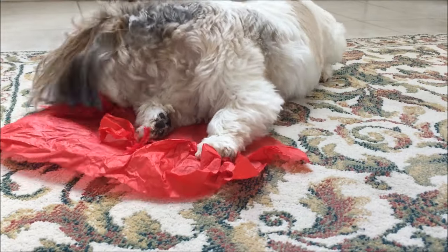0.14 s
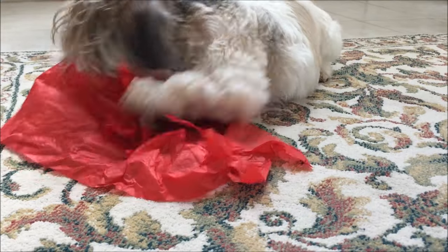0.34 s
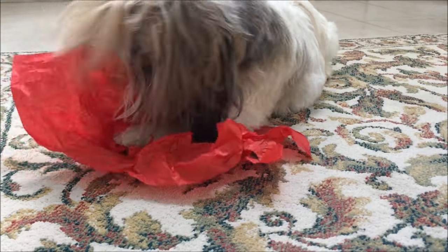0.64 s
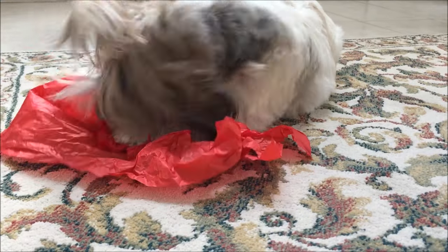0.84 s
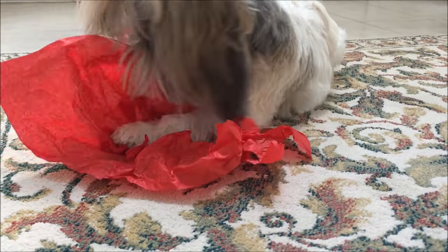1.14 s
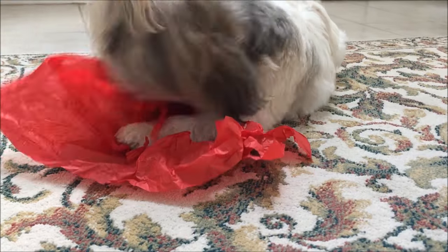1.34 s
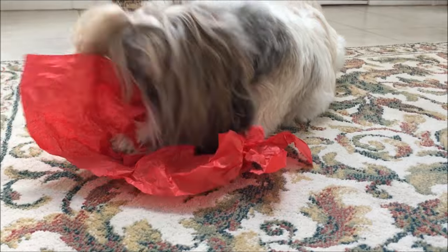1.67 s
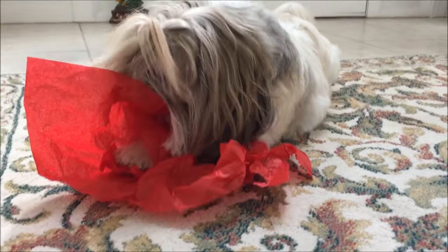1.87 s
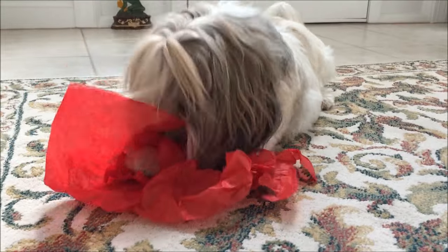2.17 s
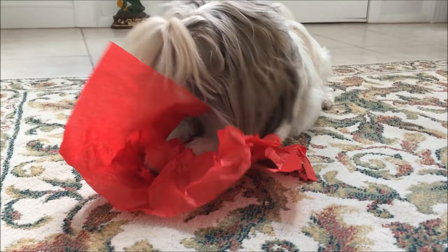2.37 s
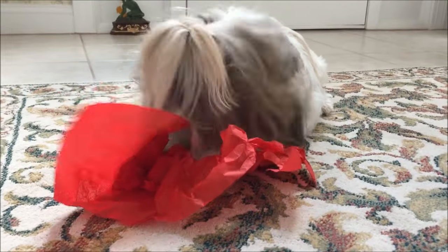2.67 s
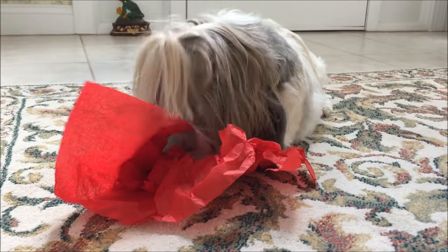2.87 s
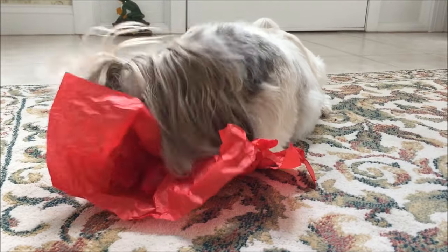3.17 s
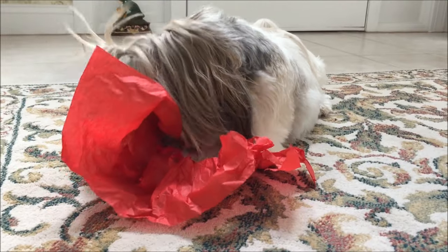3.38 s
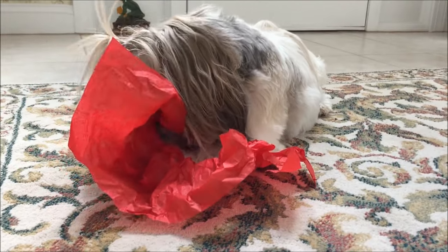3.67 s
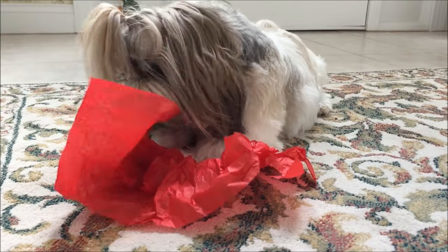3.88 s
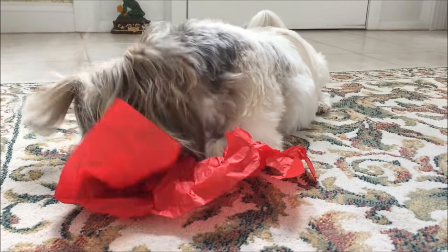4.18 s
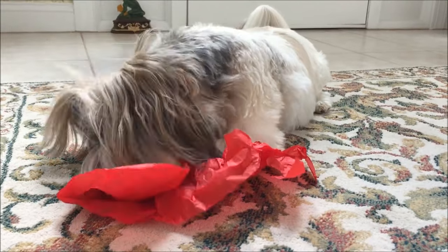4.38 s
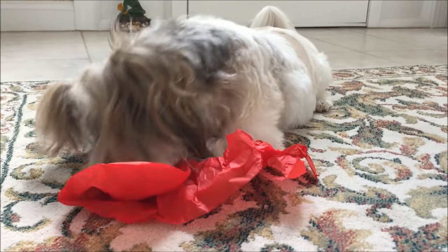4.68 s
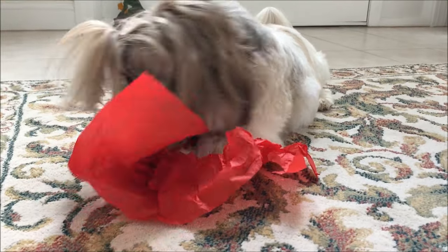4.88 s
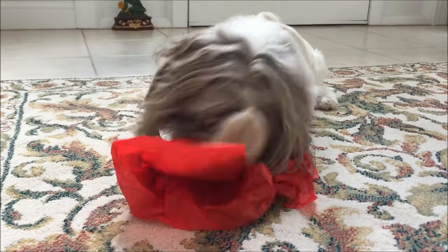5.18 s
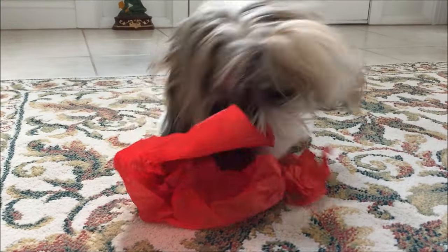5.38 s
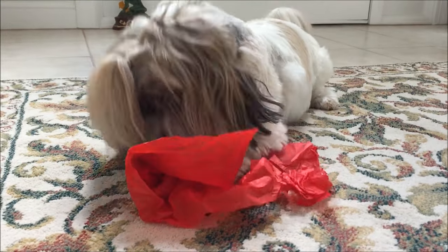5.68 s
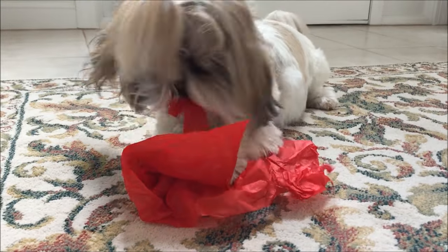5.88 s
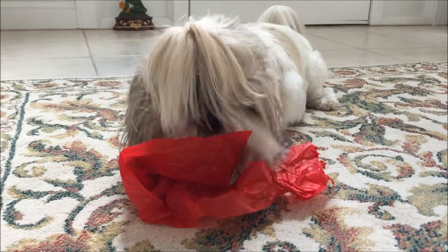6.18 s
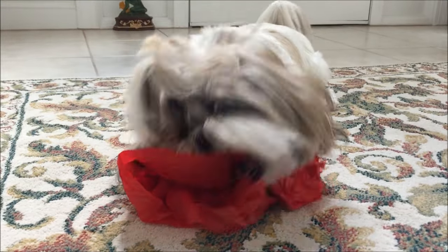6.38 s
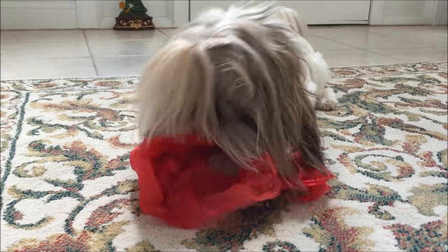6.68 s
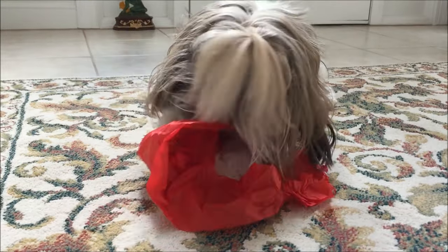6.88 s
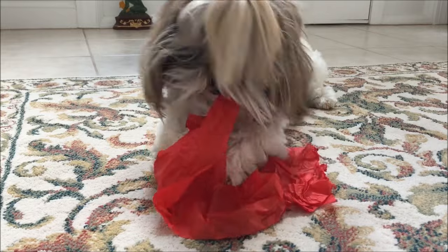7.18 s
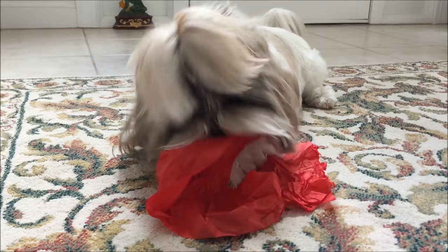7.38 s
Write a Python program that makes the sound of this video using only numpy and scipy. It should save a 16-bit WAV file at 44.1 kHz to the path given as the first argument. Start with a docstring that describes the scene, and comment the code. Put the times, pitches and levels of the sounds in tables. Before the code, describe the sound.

Close view of a small dog pawing and nosing tissue paper on a rug in a tiled room. Quiet rustling starts it, then short crackling strokes come irregularly, with crisp snaps, papery flaps and faint paw thuds. Bursts grow strongest after about five seconds, ease briefly near six, then return as sharp crinkles. The room adds a short, light echo over very faint air.

```python
"""A tiled room, where a small dog paws and noses a sheet of tissue paper on a rug.
Creases buckle in clusters of tiny slips: fast and dense under a stroke, single snaps and ticks besides.
The sheet's facets rustle and its broad panels flap; each is filtered noise driven by the same buckles.
Paws thud as short fading sine waves, the room answers with echoes of fading noise, and faint air hisses."""
import sys
import numpy as np
from scipy import signal
from scipy.fft import rfft, irfft, next_fast_len
from scipy.io import wavfile
from scipy.ndimage import uniform_filter1d, map_coordinates

SR = 44100
rng = np.random.default_rng(int(sys.argv[2]) if len(sys.argv) > 2 else 0)


def to_wav(s):
    """Save 16-bit WAV."""
    ch = np.atleast_2d(s).T  # columns
    pcm = np.round(np.clip(ch, -1, 1) * 32767)  # PCM
    wavfile.write(sys.argv[1], SR, pcm.astype(np.int16))


N = 332073  # length in samples, about 7.5 seconds

# Pushes of paw or muzzle on the sheet. Each row: start in seconds, attack in seconds, hold in seconds,
# release in seconds, crease crackle level in dB, facet rustle in dB relative to the crackle,
# panel flap in dB relative to the crackle, facet pitch in Hz.
PUSHES = [ (0.0, 0.0061, 0.052, .15, -70, -2, -13, 1400), (0.17, .045, 0.038, 0.098, -57, -1, -11.5, 1604),
          (0.33, 0.075, .06, 0.11, -55, 0, -10, 1400), (0.469, .11, 0.089, 0.051, -46, -2.5, -5.5, 1100),
          (0.66, .04, .13, .08, -51, -2.5, -5.5, 1100), (0.901, .025, .03, 0.062, -60.5, -2.5, -13, 983),
          (0.959, 0.054, .03, .035, -57, -2.5, -7, 980), (1.04, 0.024, 0.47, 0.13, -70.5, -4, -4.5, 1150),
          (1.315, 0.029, 0.072, .022, -52, -4.5, -4, 1105), (1.529, 0.05, 0.009, 0.12, -53, -1, -5.5, 990),
          (1.7, 0.039, 0.083, 0.049, -68, 0.5, 0, 1200), (1.81, 0.067, 0.039, 0.049, -51, -2, -4.5, 1201),
          (1.87, 0.064, 0.034, 0.051, -46, -1, -9, 1152), (1.96, 0.042, 0.057, .09, -54, 0.5, -6.5, 1200),
          (2.09, 0.048, .04, 0.061, -58, 1.5, -1.5, 1296), (2.21, 0.038, .015, .06, -46, 0, -10, 1148),
          (2.259, 0.059, 0.044, 0.077, -48.5, 0.5, -11, 1079),
          (2.38, .015, .15, 0.078, -45, -2.5, -6, 1179),
          (2.549, 0.064, 0.074, 0.059, -43, -2.5, -10.5, 1079),
          (2.779, 0.046, .14, 0.055, -57, -5.5, -6, 1030), (3.08, .06, 0.069, 0.095, -58, -1.5, -5, 971),
          (3.189, 0.053, .035, .14, -45.5, -5.5, -13.5, 969), (3.29, .04, .14, .1, -53, -1, -13, 1050),
          (3.49, 0.039, .17, 0.041, -55, -7, -18, 1347), (3.9, .015, .02, .05, -67, 3, -14, 1150),
          (3.943, .02, .005, .02, -40, -2.5, -9.5, 1154), (3.949, .03, 0.042, .07, -52, -3.5, -5, 1096),
          (4.11, .07, .04, 0.082, -56, 0, -7, 1051), (4.19, .05, .06, 0.055, -49.5, -2, -8, 1100),
          (4.381, .045, 0.021, .08, -49, -2.5, -14.5, 1098), (4.48, 0.029, .01, 0.12, -50, 1.5, -12, 1010),
          (4.652, 0.024, .03, .06, -56, 0.5, -20, 1403), (4.688, 0.041, .025, 0.036, -48.5, -4, -20, 1536),
          (4.751, 0.049, .1, .06, -57, -0.5, -12, 1402), (4.911, .02, 0.12, 0.038, -43, -2.5, -13.5, 1257),
          (5.06, .02, 0.061, 0.098, -60, 1.5, -10, 1156), (5.17, 0.047, 0.0795, 0.11, -53, -2, -14, 1168),
          (5.3, .1, .05, 0.053, -40, -3, -19, 1349), (5.39, 0.081, 0.054, 0.058, -36, -3, -15.5, 1299),
          (5.531, .03, .01, 0.17, -50, -2, -14, 1198), (5.701, .045, .015, 0.2, -43, -2, -14, 1370),
          (5.81, 0.073, 0.071, .13, -41.5, -5, -13, 1050), (6.099, .03, .2, .1, -68, -1, -9, 1198),
          (6.318, 0.043, .02, 0.064, -59, 0, -16, 1232), (6.39, .04, .12, .1, -64, -4.5, -12, 1271),
          (6.5, .13, .04, .14, -47, 0, -13, 1301), (6.64, .17, 0.065, 0.069, -43, -4, -16, 1281),
          (6.889, .04, 0.098, 0.081, -51, -2.5, -5.5, 1148),
          (7.07, .03, 0.074, 0.083, -40.5, -5.5, -11, 1023),
          (7.14, 0.049, 0.12, 0.078, -42, -7, -9.5, 978.3),
          (7.419, .035, 0.079, 0.096, -58, -6.5, -19, 1198)]
# Single creases that snap through. Each row: time in seconds, snap energy in dB (before the fixed trims
# in snaps), facet rustle in dB relative to the snap (before its own trim).
SNAPPING_CREASES = [(0.211, -33.5, 7), (0.4617, -30, 4), (0.5902, -13, 1), (0.6657, -18.5, 3),
                    (0.9213, -38, -6), (1.2306, -42, -5), (1.328, -28, -15), (1.3503, -22, -18),
                    (1.4198, -32, 8), (1.583, -26, -6.5), (1.85, -33, 12), (2.072, -31, 1),
                    (2.1106, -29.5, -11), (2.1818, -25.5, 1), (2.2394, -29, 1), (2.3232, -35.5, 16),
                    (2.3932, -12, -4), (2.3961, -11.5, 2.5), (2.4939, -17.5, 0), (2.505, -15.5, -1),
                    (2.5935, -16, -8), (2.6396, -12.5, -7.5), (2.6898, -16, -2), (2.7009, -21, -3),
                    (2.722, -20.5, -8), (2.7448, -21.5, -19), (2.889, -24, -8.5), (3.1646, -27, -5),
                    (3.4562, -18.5, 1), (3.4623, -22, -1.5), (3.468, -19, 2.5), (3.5331, -24.5, -5),
                    (3.671, -22, -4.5), (3.6926, -24.5, -3), (3.8272, -37, -4), (3.9535, -21, 0.5),
                    (3.966, -10.5, -4), (4.1636, -27, -20), (4.429, -28, -4), (4.5109, -21, 4.5),
                    (4.813, -28, -9.5), (4.9346, -21.5, -5), (5.2098, -25, -8), (5.3988, -13, -22),
                    (5.508, -9, -13), (5.52, -8.5, -6.5), (5.5538, -14.5, -4.5), (6.1341, -28, -11),
                    (6.2498, -34, 0.5), (6.3207, -40.5, 10.5), (6.484, -28.5, -10), (6.5584, -40.5, 16),
                    (6.858, -13, 2.5), (6.9306, -15.5, -12.5), (6.9584, -17.5, -3.5), (7.01, -22, -4.5),
                    (7.0152, -11, -13.5), (7.03, -23, -11), (7.054, -21, -2.5), (7.2279, -15, -7.5),
                    (7.259, -11.5, -14), (7.3233, -16, -21), (7.428, -33.5, -11)]
# Paws and muzzle landing on the rug. Each row: time in seconds, peak level in dB (before the trim in paws),
# pitch in Hz.
LANDINGS = [(0.601, -41, 141), (0.669, -40, 72.7), (0.71, -41.5, 61.9), (0.949, -50, 64.83),
            (1.009, -46, 51.1), (1.399, -42.5, 174.5), (1.42, -43, 86.94), (1.479, -46, 45.76),
            (1.519, -49, 68), (1.578, -47.5, 199), (2.409, -42, 80.75), (3.399, -48, 107.6),
            (4.018, -52, 123), (5.95, -49, 135), (6.858, -46, 198.8)]
# Tone colour of a buckling crease. Each row: frequency in Hz, relative strength in dB per Hz.
CREASE_COLOUR = [(1180, -32), (2000, -6), (2410, -8), (3550, 0), (3940, -4.5), (5310, 0), (7610, -3.5),
                 (9270, -4.5), (10400, -7), (11500, -4), (14600, -5.5), (15500, -16.5)]
# Tone colour of the rustling facets. Each row: frequency in Hz, relative strength in dB per Hz.
FACET_COLOUR = [(240, -32.5), (400, -0.5), (550, 1.5), (700, -0.5), (950, 0), (1400, -1.5), (1950, -2.5),
                (2400, -6), (3100, -8.5), (5300, -85)]
# Tone colour of the flapping panels. Each row: frequency in Hz, relative strength in dB per Hz.
PANEL_COLOUR = [(30, -50), (60, -6.5), (130, -3), (230, 0.5), (315, 0.5), (380, -7), (470, -9), (620, -17),
                (1000, -86.5)]
# Tone colour of the room's steady air. Each row: frequency in Hz, relative strength in dB per Hz.
AIR_COLOUR = [(20, -25), (45, 5.5), (120, 0.5), (250, -10), (500, -22), (1500, -15.5), (5000, -17),
              (15000, -25)]
# How long echoes last. Each row: frequency in Hz, time to fade by 60 dB in seconds.
ECHO_TIME = [(100, 0.17), (1000, 0.36), (4000, 0.24), (14000, 0.08)]
# How strong the echoes are. Each row: frequency in Hz, room level in dB.
ECHO_LEVEL = [(100, -15), (500, -12.5), (1200, -11.5), (3000, -11), (7000, -16), (15000, -7.5)]

TOP_HZ = 15600  # upper limit of the microphone
RAMP_DB = 20  # rise over an attack, and fall over a release
# the sheet settling under the dog: the quiet level beneath all strokes, and its facet pitch
REST_CREASE_DB, REST_FACET_DB, REST_PANEL_DB, REST_HZ = -82.5, -78, -80, 1189.8
UNEVEN_DB, UNEVEN_PER_S = 1.2, 45  # the paper catches and gives
# a crease that shakes the facets less is smaller and rings higher
RING_HZ, RING_DB_PER_OCTAVE = 1463, 9
# stray small snaps: TICK_DB is their energy over the crackle level, TICK_FACET_DB the rustle relative to it
TICKS_PER_S, TICK_DB, TICK_SCATTER_DB, TICK_FACET_DB = 9, 15.5, 3, -4


def amp(db):
    """Turn decibels into gain."""
    return 10 ** (np.asarray(db) / 20)


def unit(x):
    """Scale to an rms (average strength) of 1."""
    return x / np.sqrt(np.mean(x ** 2) + 1e-20)


def along(points, hz):
    """Read a value between (Hz, value) points, on a log frequency axis."""
    f, v = np.transpose(points)
    return np.interp(np.log(hz + 1), np.log(f + 1), v)


def coloured(x, spectrum, size=4096):
    """Pass x through a filter of unit energy that has the given spectrum and never sounds early."""
    gain = amp(along(spectrum, np.fft.rfftfreq(size, 1 / SR)))
    # folding the cepstrum (the log spectrum's transform) puts the whole response after time zero
    cepstrum = irfft(np.log(np.maximum(gain, 1e-6)))
    cepstrum[1:size // 2] *= 2
    cepstrum[size // 2 + 1:] = 0
    response = irfft(np.exp(rfft(cepstrum)))
    return signal.fftconvolve(x, response / np.linalg.norm(response))[:N]


def air(level_db=-71.0):
    """The room's faint air is steady coloured noise."""
    return amp(level_db) * unit(coloured(rng.standard_normal(N), AIR_COLOUR))


def handling(step=64):
    """Each stroke swells, holds and dies away; powers add to give crease, facet, panel dB and facet pitch."""
    t = np.arange(0, N, step) / SR
    start, attack, hold, release, db, facet_db, panel_db, hz = np.transpose(PUSHES)[:, :, None]
    rising = np.maximum(start + attack - t, 0) / attack
    falling = np.maximum(t - start - attack - hold, 0) / release
    level = np.where(t < start, -np.inf, db - RAMP_DB * (rising + falling))
    creases = amp(level) ** 2
    facets = amp(level + facet_db) ** 2
    panels = amp(level + panel_db) ** 2

    def total_db(power, rest_db):
        """Add all strokes and the resting level, in dB."""
        return 10 * np.log10(power.sum(0) + amp(rest_db) ** 2)

    # the pitch is an average, weighted by how strongly each stroke moves the facets
    rest = amp(REST_FACET_DB) ** 2
    pitch = ((facets * hz).sum(0) + rest * REST_HZ) / (facets.sum(0) + rest)
    controls = [
        total_db(creases, REST_CREASE_DB),
        total_db(facets, REST_FACET_DB),
        total_db(panels, REST_PANEL_DB),
        pitch,
    ]
    return [np.interp(np.arange(N) / SR, t, c) for c in controls]


def steady(x, span):
    """Hold the power of x near 1 over each span of seconds."""
    width = max(int(span * SR), 2)
    power = uniform_filter1d(uniform_filter1d(x ** 2, width), width)
    return x / np.sqrt(np.abs(power) + 1e-12)


def slips(times, sizes, spread, count=24):
    """Each buckle is an avalanche of tiny slips, of total energy size squared and mean delay spread (s)."""
    when = times[:, None] + spread * rng.gamma(2, .5, (len(times), count))
    push = rng.standard_normal(when.shape)
    push *= (sizes / np.linalg.norm(push, axis=1))[:, None]
    sample = np.clip(when * SR, 0, N).astype(int)
    return np.bincount(sample.ravel(), push.ravel(), N + 1)[:N]


def shifting(x, depth_db, width=3, life=5):
    """The crumpled sheet keeps changing shape, so its resonances come and go."""
    z = signal.stft(x, nperseg=512)[2]
    rows, cols = np.indices(z.shape)
    # a smooth random map over frequency (rows) and time (columns)
    field = map_coordinates(rng.standard_normal(z.shape), [rows / width, cols / life], order=1)
    return signal.istft(z * amp(depth_db * unit(field)), nperseg=512)[1][:N]


def focused(x, facet_hz, lift_db=6.5, octaves=0.75):
    """The facets that move most lift a broad band, which follows their pitch."""
    hz, t, z = signal.stft(x, SR, nperseg=512)
    centre = np.interp(t, np.arange(N) / SR, facet_hz)
    distance = np.log2((hz[:, None] + 1) / centre)
    lift = lift_db * np.exp(-.5 * (distance / octaves) ** 2)
    return unit(signal.istft(z * amp(lift), SR, nperseg=512)[1][:N])


def rustle(times, sizes, spectrum, spread, scatter_db, rub, shift_db):
    """One part of the sheet sounds at every buckle, over the hiss of paper sliding on paper."""
    own = amp(scatter_db * rng.standard_normal(len(times)))
    buckles = steady(slips(times, sizes * own, spread), span=0.052)
    hiss = rub * rng.standard_normal(N)
    sound = shifting(coloured(buckles + hiss, spectrum), shift_db)
    return steady(sound, span=0.091)


def wobble(rate):
    """A smooth random curve through rate random points a second."""
    return map_coordinates(rng.standard_normal(int(N * rate / SR) + 4), [np.arange(N) * rate / SR])


def crumpling(crease_db, facet_db, panel_db, facet_hz, idle_rate=75, busy_rate=680, size_db=2.5):
    """Harder strokes buckle more creases a second, of random size; creases, facets and panels all sound."""
    effort = unit(amp(crease_db))
    rate = idle_rate + busy_rate * effort ** .8  # buckles per second
    times = np.flatnonzero(rng.random(N) < rate / SR) / SR
    sizes = amp(size_db * np.minimum(rng.standard_normal(len(times)), 2.3))
    creases = rustle(times, sizes, CREASE_COLOUR, spread=.0008, scatter_db=2, rub=.7, shift_db=1.8)
    facets = rustle(times, sizes, FACET_COLOUR, spread=0.001412, scatter_db=4.0, rub=0.91, shift_db=2.5)
    facets = focused(facets, facet_hz)
    panels = rustle(times, sizes, PANEL_COLOUR, spread=0.00193, scatter_db=3.0, rub=0.44, shift_db=3.0)
    sheet = amp(crease_db) * creases + amp(facet_db) * facets + amp(panel_db) * panels
    return sheet * amp(UNEVEN_DB * wobble(UNEVEN_PER_S))


def tail(delay=.005):
    """Tiles and doors return a short tail after delay seconds: noise that fades at its own rate per pitch."""
    hz, t, z = signal.stft(rng.standard_normal(SR // 2), SR, nperseg=256)
    decay = amp(-60 * t / along(ECHO_TIME, hz)[:, None])
    # even out the energy of each band, then give it its room level
    decay *= amp(along(ECHO_LEVEL, hz))[:, None] / np.sqrt(np.mean(decay ** 2, axis=1, keepdims=True))
    noise = signal.istft(z * decay, SR, nperseg=256)[1] / np.sqrt(SR / 2)
    return np.pad(noise, (int(delay * SR), 0))


def room(x, count=12):
    """The sounding spot moves about the sheet, so each of count stretches meets its own echoes."""
    out = np.zeros(N + SR)
    for part in np.array_split(np.arange(N), count):
        echo = signal.fftconvolve(x[part], tail())
        out[part[0]:][:len(echo)] += echo
    return out[:N]


def ticks(crease_db, spread=0.00055, ceiling_db=-27):
    """Small creases let go at random, louder while the sheet is being worked."""
    at = np.flatnonzero(rng.random(N) < TICKS_PER_S / SR)
    scatter = TICK_SCATTER_DB * rng.standard_normal(len(at))
    db = np.minimum(crease_db[at] + TICK_DB + scatter, ceiling_db)
    crack = coloured(slips(at / SR, amp(db), spread), CREASE_COLOUR)
    shake = coloured(slips(at / SR, amp(db + TICK_FACET_DB), spread), FACET_COLOUR)
    return crack + shake


def snaps(crack_db=-2, rustle_db=-3, ring_db=-19, cycles=28, spread=.001):
    """A stiff crease cracks, shakes the facets beside it and rings, fading by 60 dB over some cycles."""
    s, db, facet_db = np.transpose(SNAPPING_CREASES)
    ring_hz = np.clip(RING_HZ * 2 ** (-facet_db / RING_DB_PER_OCTAVE), 1100, 6500)
    crack = coloured(slips(s, amp(db + crack_db), spread, count=48), CREASE_COLOUR)
    shake = coloured(slips(s, amp(db + facet_db + rustle_db), spread=0.001272), FACET_COLOUR)
    ring, t = np.zeros(N + SR), np.arange(SR // 20) / SR
    for start, level, hz in zip(s, db, ring_hz):
        fade = amp(level + ring_db - 60 * t * hz / cycles) * (1 - np.exp(-t / spread))
        ring[round(start * SR):][:len(t)] += fade * np.sin(2 * np.pi * hz * t)
    return crack + shake + ring[:N]


def paws(thud_db=-2, t60=0.054, attack=0.0026):
    """The padded floor gives a soft push, a sine that fades by 60 dB in t60 seconds."""
    out, t = np.zeros(N + SR), np.arange(SR // 4) / SR
    for s, db, hz in LANDINGS:
        push = np.sin(2 * np.pi * hz * t) * amp(-60 * t / t60) * (1 - np.exp(-t / attack))
        out[round(s * SR):][:len(t)] += amp(db + thud_db) * push / np.abs(push).max()
    return out[:N]


def scene():
    """Paper and paws in the room, over its faint steady air."""
    crease_db, facet_db, panel_db, facet_hz = handling()
    paper = crumpling(crease_db, facet_db, panel_db, facet_hz) + ticks(crease_db) + snaps()
    dog = paper + paws()
    return (dog + room(dog) + air())[None]


def record(dry, low_hz=42):
    """The microphone rolls off the deepest bass and cuts steeply above its upper limit."""
    size = next_fast_len(N + SR // 2)
    hz = np.fft.rfftfreq(size, 1 / SR)
    thinned = signal.sosfilt(signal.butter(3, low_hz, "highpass", fs=SR, output="sos"), dry)
    top_cut = np.sqrt(1 + (hz / TOP_HZ) ** 200)
    return irfft(rfft(thinned, size) / top_cut, size)[:, :N]


dry = scene()
out = record(dry)
to_wav(out)
```